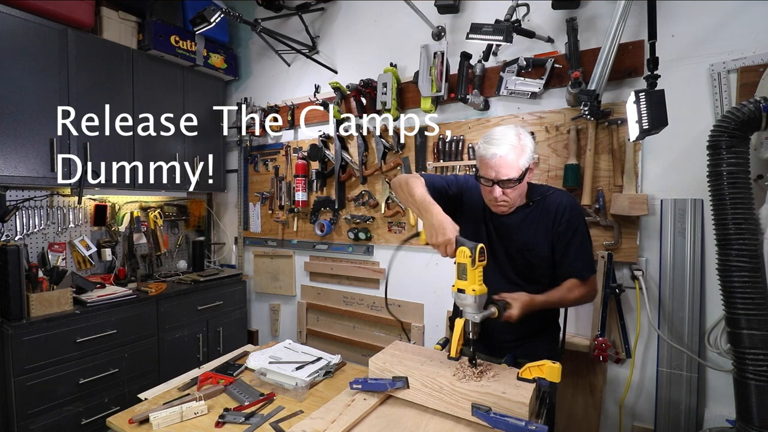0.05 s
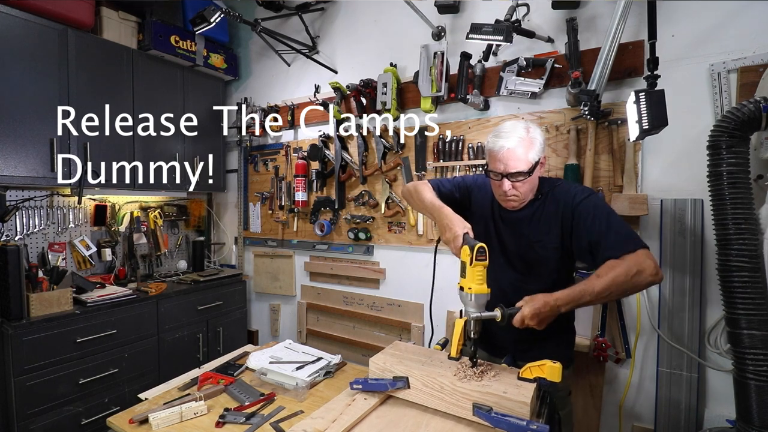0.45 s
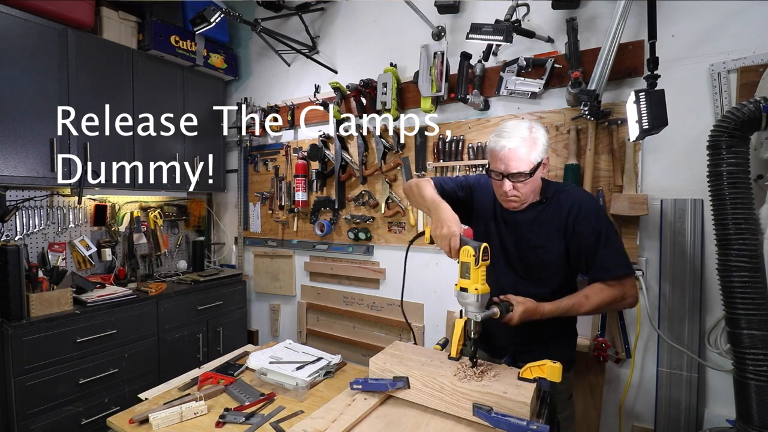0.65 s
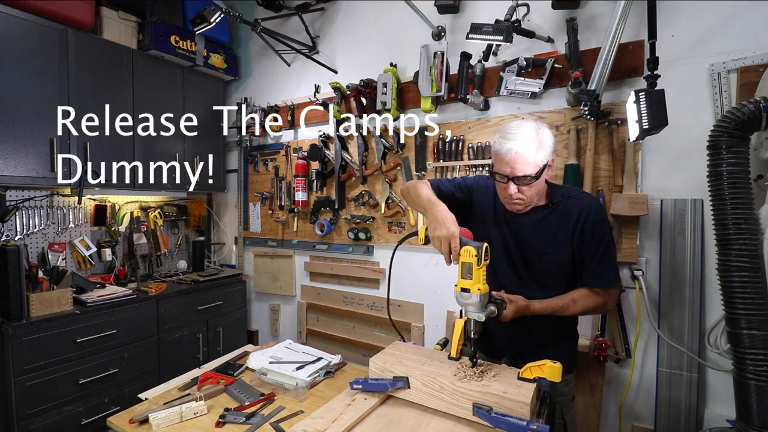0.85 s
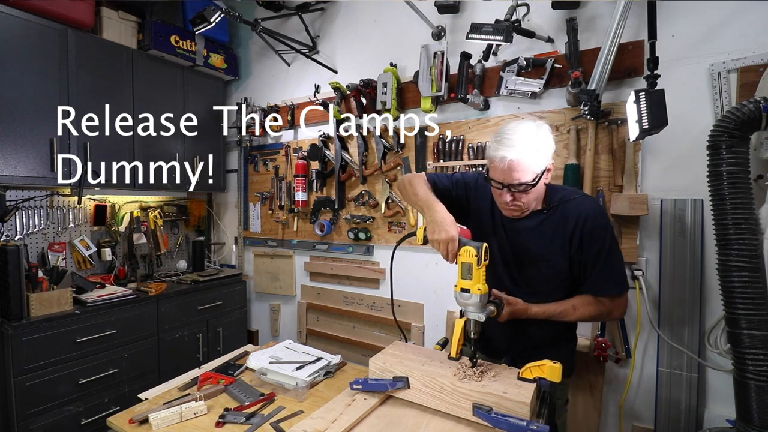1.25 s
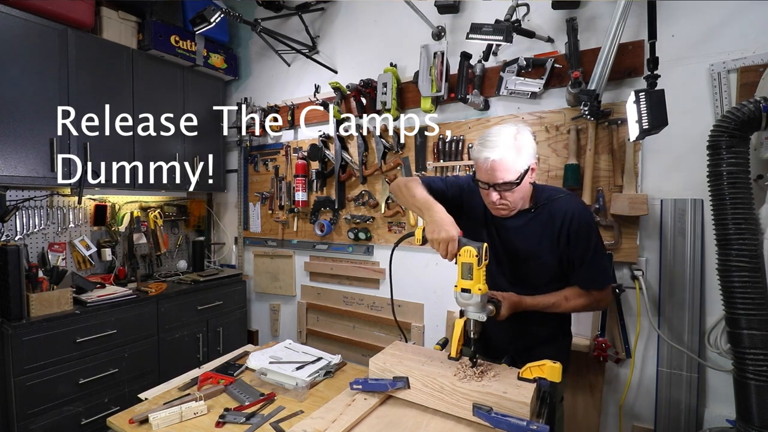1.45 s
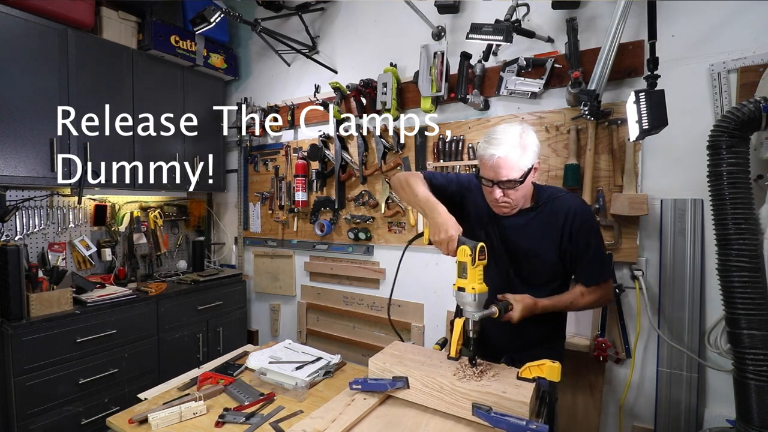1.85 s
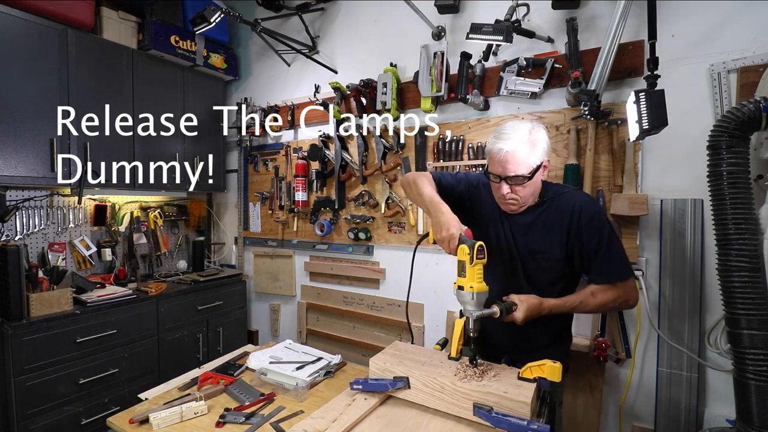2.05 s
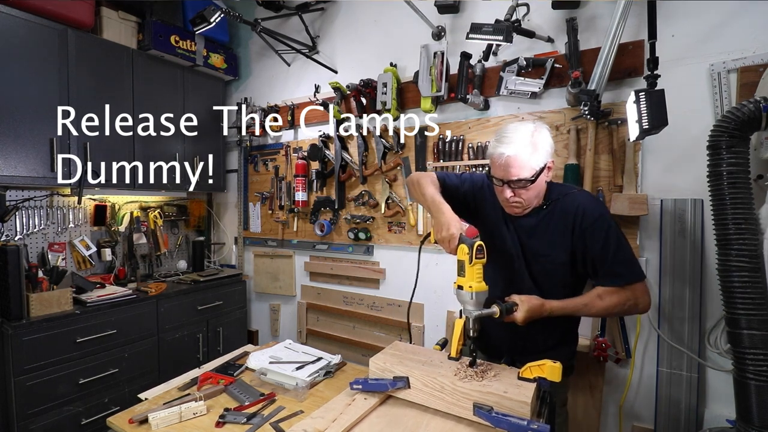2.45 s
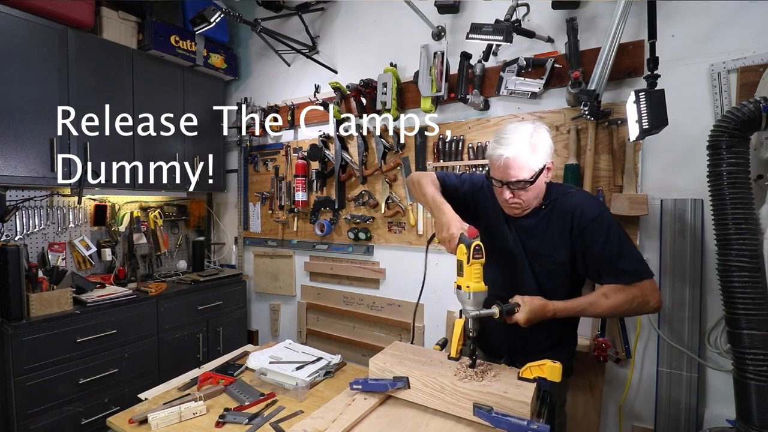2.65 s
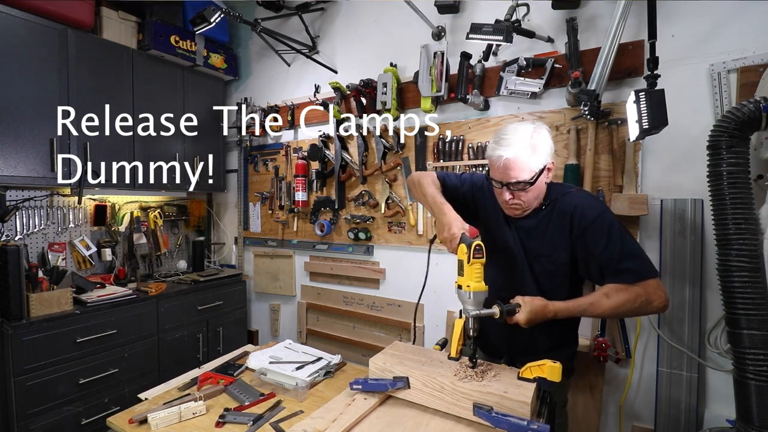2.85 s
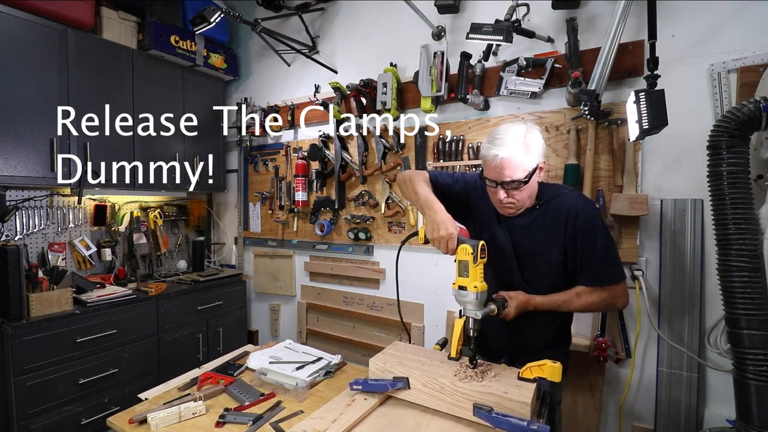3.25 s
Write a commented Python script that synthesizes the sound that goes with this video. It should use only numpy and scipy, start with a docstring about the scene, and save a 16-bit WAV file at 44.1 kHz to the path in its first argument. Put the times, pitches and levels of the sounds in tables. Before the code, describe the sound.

An electric drill spins up with a rasping, rising whine in a workshop, clicks at 0.3 seconds and coasts down. Faint wood chip crunches and clicks follow until 1.1. The bit scrapes and knocks at 1.7. At 1.9 the drill clicks and revs again, then jams from 2.2 into a fast, pulsing rattle, with low thumps and clothing rubbing the body-worn microphone. It winds down around 3.2 seconds.

```python
"""A corded drill bores into a clamped board in a workshop. Brushes and gears rasp, the mesh whines.
It spins up briefly and coasts; the bit scrapes and knocks in its hole. It spins up again, binds,
and its torque limiter feeds it one kick in every four mains cycles. The kicks rattle the gears
and shake the operator, whose shirt bumps the microphone worn on it."""
import sys
import numpy as np
from scipy import signal
from scipy.fft import rfft, irfft
from scipy.io import wavfile
from scipy.ndimage import uniform_filter1d

SR = 44100
rng = np.random.default_rng(int(sys.argv[2]) if len(sys.argv) > 2 else 0)


def dump(signal):
    """Clip the signal to [-1, 1] and save it as 16-bit WAV at the path in sys.argv[1]."""
    limited = np.clip(np.atleast_2d(signal).T, -1, 1)
    pcm = np.round(limited * 32767).astype(np.int16)
    wavfile.write(sys.argv[1], SR, pcm)


N = 149940
T = np.arange(N) / SR

# limiter kicks in turn: (rattle [dB], shake [dB])
KICKS = [(-38, -28.5), (-37.5, -31.5), (-38.5, -23), (-37.5, -25.5), (-35.5, -24), (-35, -29.5),
         (-32.5, -25), (-33.5, -27), (-32, -26), (-35.5, -30.5), (-34, -30.5), (-34, -27), (-37, -27.5),
         (-38, -25.5), (-49, -26)]
MAINS_HZ, CYCLES_PER_KICK, FIRST_KICK_S = 60, 4, 2.163
KICK_TIMES_S = FIRST_KICK_S + np.arange(len(KICKS)) * CYCLES_PER_KICK / MAINS_HZ


def amp(db):
    """Decibels to gain."""
    return 10 ** (np.asarray(db) / 20)


def unit(x):
    """Scale to rms 1."""
    return x / np.sqrt(np.mean(x ** 2) + 1e-20)


def read(points, hz):
    """Table lookup on a log-frequency axis."""
    f, value = np.transpose(points)
    return np.interp(np.log(hz + 1), np.log(f + 1), value)


def curve(points, column=1):
    """One column of a time table at every sample."""
    rows = np.array(points)
    return np.interp(T, rows[:, 0], rows[:, column])


def add(mix, s, sound):
    """Mix a sound in at time s."""
    part = mix[max(round(s * SR), 0):][:len(sound)]
    part += sound[:len(part)]


def colour(x, spectrum):
    """Filter by a spectrum table, rms 1."""
    return unit(irfft(rfft(x) * amp(read(spectrum, np.fft.rfftfreq(N, 1 / SR))), N))


def resonate(x, hz, width_hz):
    """One resonance."""
    return signal.lfilter(*signal.iirpeak(hz, hz / min(width_hz, SR / 4), SR), x)


def wander(hz):
    """Low-passed noise, rms 1."""
    return unit(signal.sosfilt(signal.butter(2, hz, fs=SR, output="sos"), rng.standard_normal(N)))


def patchy(x, spread_db):
    """Bands swell and fade independently, rms 1."""
    z = signal.stft(x, SR, nperseg=512)[2]
    field = uniform_filter1d(rng.standard_normal(z.shape), size=4, axis=0)
    field = unit(uniform_filter1d(field, size=5, axis=1))
    return unit(signal.istft(z * amp(spread_db * field), SR, nperseg=512)[1][:N])


def room_tone():
    """Quiet, steady, mostly low noise."""
    # noise spectrum: (frequency [Hz], relative level [dB])
    spectrum = [(12, -38.5), (20, -12), (64, -1), (207, -8.5), (245, -5.5), (565, -22), (1670, -26),
                (2150, -23), (3960, -29.5), (15500, -35.5)]
    return amp(-65.5) * colour(rng.standard_normal(N), spectrum)


def workshop(x):
    """Short diffuse tail of sparse reflections."""
    # room decay: (frequency [Hz], t60 [s])
    decay = [(100, 0.12), (600, 0.53), (3000, 0.17), (12000, .25)]
    taps = rng.choice([-1., 1.], SR // 2) * (rng.random(SR // 2) < 3000 / SR)
    taps[:SR // 250] = 0
    hz, t, z = signal.stft(taps, SR, nperseg=256)
    tail = signal.istft(z * amp(-60 * t / read(decay, hz)[:, None]), SR, nperseg=256)[1]
    return signal.fftconvolve(x, tail / np.linalg.norm(tail))[:N]


def clothing():
    """Cloth rubs and bumps the microphone as the arms move."""
    # rubbing: (time [s], level [dB])
    rubbing = [(0, -65), (.08, -47.5), (.17, -42), (.4, -43.5), (.6, -56), (.82, -50.5), (.98, -66),
               (1.62, -65), (1.78, -45.5), (1.84, -66), (1.89, -40), (2.1, -47.5), (2.4, -38),
               (2.75, -43.5), (3.08, -38), (3.19, -47.5), (3.27, -63.5), (3.4, -60)]
    # rustle spectrum: (frequency [Hz], relative level [dB])
    rustle = [(15, -6), (40, 7), (130, -4), (300, -12.5), (600, -15.5), (1500, -31), (6000, -67)]
    # dull bumps: (time [s], peak [dB], centre [Hz])
    bumps = [(0.178, -32.5, 107), (0.336, -33, 53), (.373, -35.5, 55), (0.443, -46, 50),
             (0.506, -29.5, 147), (.511, -37, 454), (0.54, -50, 50), (0.69, -37.5, 410), (0.739, -42.5, 45),
             (.816, -37.5, 139), (1.501, -49.5, 153), (1.576, -48, 55), (2.3, -22, 117.4),
             (2.304, -22, 240), (2.365, -29, 238), (2.414, -22.5, 114), (2.431, -25.5, 166),
             (2.479, -21.5, 116), (2.496, -37, 147), (2.546, -25, 143), (2.567, -32, 137),
             (2.629, -36, 117), (2.697, -43, 230), (2.751, -30, 147), (2.766, -31, 138), (2.857, -28, 300),
             (2.898, -29, 125), (2.926, -26.5, 306), (2.947, -50, 110.8), (2.993, -31.5, 261),
             (3.003, -26, 142), (3.072, -24.5, 122), (3.093, -37, 135), (3.1, -30, 403),
             (3.142, -32.5, 108), (3.184, -36, 175)]
    out = amp(curve(rubbing)) * colour(rng.standard_normal(N) * (1 + .5 * wander(30)), rustle)
    t = np.arange(-SR // 20, SR // 20) / SR
    for s, db, hz in bumps:
        u = (np.pi * hz * t) ** 2
        add(out, s + t[0], amp(db) * (2 * u - 1) * np.exp(-u))  # Ricker pulse
    return out


def shake():
    """Each kick sets the operator's arms and chest swaying."""
    # body modes: (frequency [Hz], relative level [dB], t60 [s])
    modes = [(30.2, -1.3, 0.21), (59.8, 0.47, 0.12)]
    lead_s, rise_s = 0.01114, 0.0022
    t, out = np.arange(SR // 3) / SR, np.zeros(N)
    sway = sum(amp(db - 60 * t / t60) * np.sin(2 * np.pi * hz * t) for hz, db, t60 in modes)
    sway *= 1 - np.exp(-t / rise_s)
    for s, (_, db) in zip(KICK_TIMES_S, KICKS):
        add(out, s - lead_s, amp(db) * sway)
    return out


def snaps():
    """Trigger, chuck and chips give short, broad cracks."""
    # cracks: (time [s], level [dB], centre [Hz], decay [s])
    cracks = [(.328, -20, 2500, 0.0024), (0.393, -34.5, 2960, 0.0023), (.436, -47, 5000, 0.0012),
              (.483, -40.5, 2930, 0.0016), (0.569, -48, 1800, .004), (0.595, -51, 1290, 0.0017),
              (0.691, -48, 1190, 0.0031), (0.731, -45, 1460, 0.0055), (.81, -53, 3500, .004),
              (.854, -43.5, 2150, 0.0029), (1.054, -47, 1775, 0.0048), (1.079, -68, 3960, .004),
              (1.869, -19, 5560, 0.001), (3.13, -40, 2977, .003), (3.154, -46.5, 3500, .003),
              (3.23, -42.5, 2290, 0.0032)]
    t, out = np.arange(SR // 12) / SR, np.zeros(N)
    for s, db, hz, decay_s in cracks:
        band = resonate(rng.standard_normal(len(t)), hz, hz * 0.53)
        crack = unit(resonate(band, hz, hz * 2.5))
        add(out, s, amp(db) * 0.48 * crack * np.exp(-t / decay_s))
    return out


def seating():
    """The bit scrapes down its hole and knocks on the board."""
    # scrape spectrum: (frequency [Hz], relative level [dB])
    spectrum = [(180, -31), (300, -3.5), (885, -4.5), (1230, 0), (1680, -11.5), (2840, -20.5), (3100, -19),
                (3370, -24), (3890, -21.5), (9000, -42), (11700, -74), (19800, -120)]
    # board modes: (frequency [Hz], relative level [dB], t60 [s], rise [s])
    modes = [(108.4, -11, 0.21, 0.0061), (214, -1, 0.14, .01), (276, 5.5, 0.081, 0.0075),
             (400, -4, 0.062, 0.0037), (476, -16.5, 0.21, 0.0048), (551, -5, 0.057, .004),
             (712, -17, 0.084, 0.0022), (967, -11, 0.036, .001), (1190, -23, 0.056, 0.00084),
             (1510, -22, 0.085, 0.00091)]
    scrape_s, length_s, knock_s = 1.662, 0.06, 1.702
    progress = np.clip((T - scrape_s) / length_s, 0, 1)
    scrape = amp(-49.5) * (4 * progress * (1 - progress)) ** 0.13
    crack = amp(-42.5) * (T > knock_s) * np.exp(-abs(T - knock_s) / 0.0047)
    out = (crack + scrape) * colour(rng.standard_normal(N) * (1 + 0.42 * wander(130)), spectrum)
    t = np.arange(SR // 2) / SR
    knock = sum(amp(db - 60 * t / t60) * (1 - np.exp(-t / rise_s))
                * np.sin(2 * np.pi * (hz * t + rng.random())) for hz, db, t60, rise_s in modes)
    add(out, knock_s, amp(-30) * knock)
    return out


def chips():
    """Chips crunch as the bit is eased back."""
    # crunching: (time [s], level [dB])
    crunch = [(.44, -82.5), (.48, -64), (.56, -63.5), (.62, -63.5), (.735, -60.5), (.78, -68.5), (.86, -63),
              (.89, -82.5), (1.02, -81.5), (1.06, -61.5), (1.12, -70), (1.17, -105)]
    # chip spectrum: (frequency [Hz], relative level [dB])
    spectrum = [(150, -26), (400, 3), (800, 3.5), (2200, -5), (3000, -11), (6500, -12.5), (8000, -28.5),
                (15000, -33)]
    return amp(curve(crunch)) * colour(rng.standard_normal(N) * amp(3.4 * wander(170)), spectrum)


def ringing_tones():
    """Brief ringing tones: the housing sings as the rising gear whine passes its resonances, and the bit
    squeaks in the wood near 2 kHz and 3.4 kHz."""
    # tones: (time [s], pitch [Hz], level [dB], half length [s])
    tones = [(0.24, 2080, -33, 0.022), (0.275, 2007, -24, 0.0076), (0.285, 858, -27.5, 0.012),
             (2.038, 3426, -35.5, 0.027), (2.042, 1576, -37.5, 0.019), (2.096, 725.6, -34, 0.011)]
    out = np.zeros(N)
    for s, hz, db, half_s in tones:
        phase = 2 * np.pi * np.cumsum(hz * (1 + 0.014 * wander(153.5))) / SR
        out += amp(db) * np.exp(-((T - s) / half_s) ** 2) * unit(np.sin(phase))
    return out


def gearbox():
    """Each kick slams the gears across their backlash."""
    # gearbox modes: (frequency [Hz], relative level [dB], t60 [s])
    modes = [(870, -3.5, 0.051), (596, -10, .08), (1871, -11, 0.074), (4340, -4, 0.035)]
    t, out = np.arange(SR // 8) / SR, np.zeros(N)
    for s, (kick_db, _) in zip(KICK_TIMES_S, KICKS):
        for hz, db, t60 in modes:
            tone = np.sin(2 * np.pi * hz * rng.uniform(0.91, 1.03) * t)
            add(out, s - .003, amp(kick_db + db - 60 * t / t60) * tone)
    return out


def rotor(mesh_phase, pinion_teeth=5, count=70):
    """Armature unevenness repeats each revolution: a comb that climbs with speed."""
    orders = rng.standard_normal(count) + 1j * rng.standard_normal(count)
    return unit(np.polyval(orders, np.exp(1j * mesh_phase / pinion_teeth)).real)


def grit(grains_per_s=3500, spread_db=2.5, share=0.46):
    """Rasp of brushes and gears: random clicks in noise."""
    grains = (rng.random(N) < grains_per_s / SR) * rng.choice([-1, 1], N)
    grains = grains * amp(spread_db * np.minimum(rng.exponential(1, N), 4))
    return share * unit(grains) + (1 - share) * rng.standard_normal(N)


def motor(run, rasp, buzz, teeth, whine_db, ring_db, jitter):
    """Rasp, pulsing with each mains half-wave and gear tooth, rings the housing; the mesh whines."""
    # housing modes: (frequency [Hz], width [Hz], relative level [dB])
    housing = [(680, 110, -4.5), (879, 74, -11.5), (2030, 560, -18), (3520, 53, -19.5), (3820, 180, -18.5)]
    # whine partials: (multiple of the mesh [1], relative level [dB])
    partials = [(1, -12), (2, -9.5), (3, -21), (4, -32), (5, -13)]
    mesh_phase = 2 * np.pi * np.cumsum(curve(run) * (1 + jitter * wander(69))) / SR
    mains = 1 + buzz * np.cos(2 * np.pi * 2 * MAINS_HZ * T)
    drive = patchy(grit() + 0.48 * rotor(mesh_phase), spread_db=2.5)
    chatter = amp(2.2 * wander(350))
    drive *= chatter * mains * (1 + teeth * np.cos(mesh_phase))
    ring = sum(amp(db) * unit(resonate(drive, hz, width_hz)) for hz, width_hz, db in housing)
    whine = sum(amp(db) * unit(np.cos(k * mesh_phase) * (1 + 0.54 * wander(90))) for k, db in partials)
    return unit(colour(drive, rasp) + amp(ring_db) * ring + amp(whine_db) * whine * mains)


def run_gain(run):
    """Gain of a motor run, zero outside its span."""
    return amp(curve(run, 2)) * (T > run[0][0]) * (T < run[-1][0])


def stall(rise_s=0.014, fall_s=0.0051, backlash_lead_s=0.025):
    """The bound motor surges with each kick; its sparks hiss."""
    # rattle between kicks: (time [s], gear mesh [Hz], level [dB])
    run = [(2.1, 860, -70), (2.13, 855.7, -52.5), (2.38, 850, -59), (2.6, 862.6, -58), (2.95, 856.5, -56),
           (3.08, 752, -53), (3.15, 503, -61.5), (3.21, 302.5, -86)]
    # rasp spectrum: (frequency [Hz], relative level [dB])
    rasp = [(180, -24), (300, -5.5), (461, -1), (600, -0.5), (794, -3.5), (877, -4), (1160, -14.5),
            (1260, -4.5), (1460, -10.5), (1870, -1), (2250, -6), (3450, -9), (3690, -16), (4070, -9),
            (7500, -25), (8280, -37), (15500, -46)]
    surges = sum(amp(db) * np.exp(-np.maximum((s - T) / rise_s, (T - s) / fall_s))
                 for s, (db, _) in zip(KICK_TIMES_S, KICKS))
    surges += 0.21 * np.roll(surges, -round(backlash_lead_s * SR))  # gears take up slack first
    rattle = motor(run, rasp, buzz=0.2, teeth=0.32, whine_db=-5, ring_db=-7, jitter=0.0523)
    sparks = amp(-17) * unit(resonate(rng.standard_normal(N), 9100, 2500))
    return (run_gain(run) + surges) * rattle + run_gain(run) * sparks


def spin_ups():
    """Two trigger pulls: the motor coasts after the first and binds on the second."""
    # motor runs: (time [s], gear mesh [Hz], level [dB])
    pull_1 = [(.048, 299.4, -99), (.056, 298.9, -62), (.09, 350.1, -54.5), (.12, 433.4, -36),
              (.168, 506.3, -32), (.205, 619.6, -30.5), (.242, 664.7, -25.5), (.266, 744.2, -26.5),
              (.284, 839.4, -25), (.297, 870.5, -32), (.306, 846.5, -40), (.36, 695, -42.5),
              (.43, 600, -57.5), (.55, 394.7, -69.5), (.62, 303.4, -98)]
    pull_2 = [(1.861, 300, -91), (1.867, 305.8, -44), (1.882, 328.2, -31.5), (1.9, 383.6, -39),
              (1.915, 423.6, -32), (1.992, 609, -31.5), (2.03, 695.5, -28), (2.06, 746, -30),
              (2.098, 845, -28), (2.118, 860, -44), (2.16, 830, -72), (2.2, 860, -78)]
    # rasp spectra: (frequency [Hz], relative level [dB])
    rasp_1 = [(150, -77), (250, -24), (366, -25), (442, -21.5), (717, -10), (795, -7.5), (852, -5),
              (961, -11), (1200, -11.5), (1670, -3.5), (1820, -3.5), (2130, -8), (2320, -6.5), (4100, -15),
              (15500, -44)]
    rasp_2 = [(150, -63), (250, -25), (385, -33), (499, -5), (544, -3.5), (729, -9), (897, 4.5),
              (995, -8.5), (1270, -2), (1990, -0.5), (3010, -7.5), (3450, -5), (3760, -8.5), (4170, -6.5),
              (6420, -19), (7380, -19), (15500, -42)]
    first = motor(pull_1, rasp_1, buzz=0.12, teeth=0.75, whine_db=-3.5, ring_db=-5.5, jitter=.006)
    second = motor(pull_2, rasp_2, buzz=0.15, teeth=0.27, whine_db=-3, ring_db=-8, jitter=0.00633)
    return run_gain(pull_1) * first + run_gain(pull_2) * second


def scene():
    """Drill and board in the room, body noise at the microphone, room tone."""
    tool = spin_ups() + stall() + gearbox() + ringing_tones() + chips() + snaps()
    board = seating()
    room = amp(-14.5) * workshop(tool + amp(7) * board)
    return (tool + board + room + shake() + clothing() + room_tone())[None]


def record(dry):
    """Band limits."""
    low_hz, high_hz = 16, 15850
    dry = signal.sosfilt(signal.butter(2, low_hz, "high", fs=SR, output="sos"), dry)
    return signal.oaconvolve(dry, signal.firwin(511, high_hz, window=("kaiser", 9), fs=SR)[None], "same")


dry = scene()
out = record(dry)
dump(out)
```